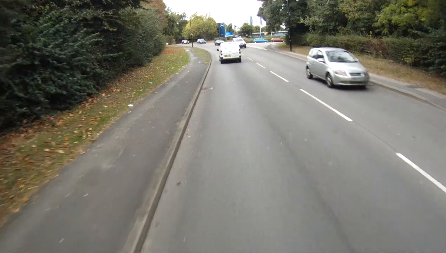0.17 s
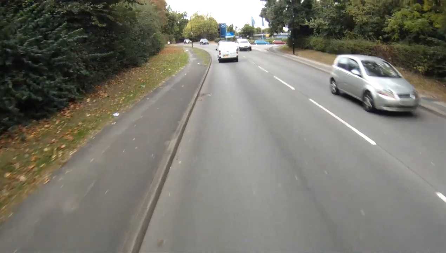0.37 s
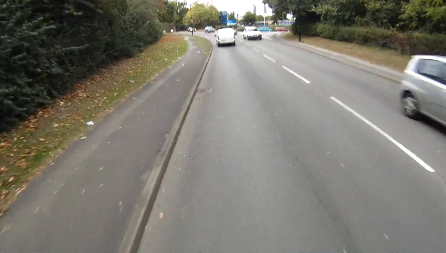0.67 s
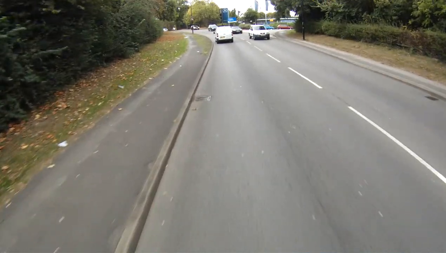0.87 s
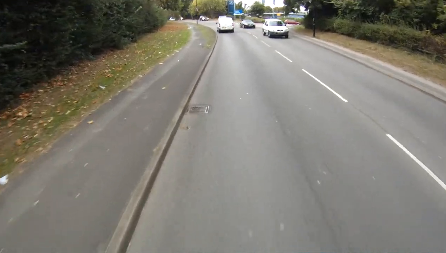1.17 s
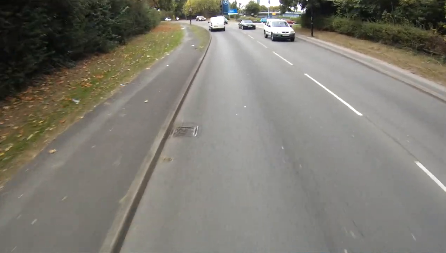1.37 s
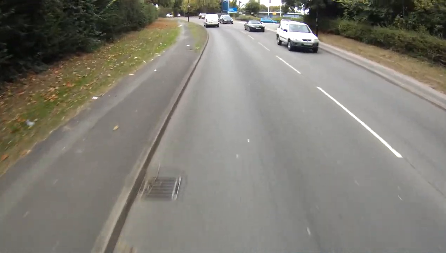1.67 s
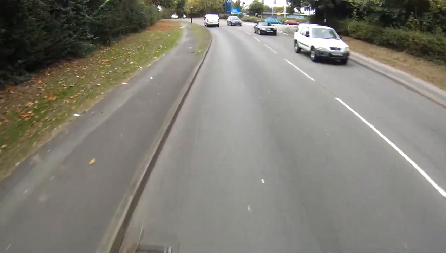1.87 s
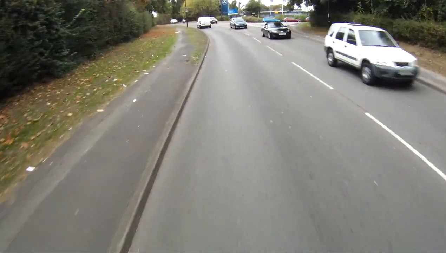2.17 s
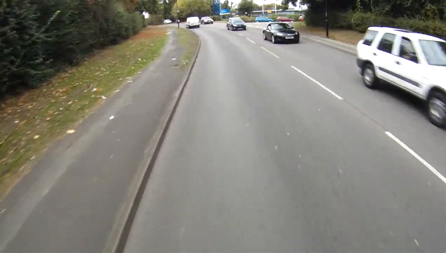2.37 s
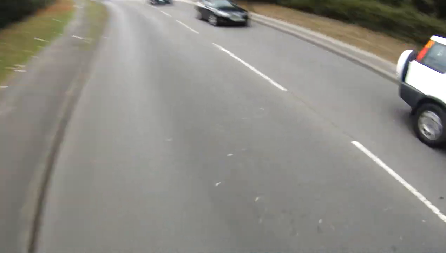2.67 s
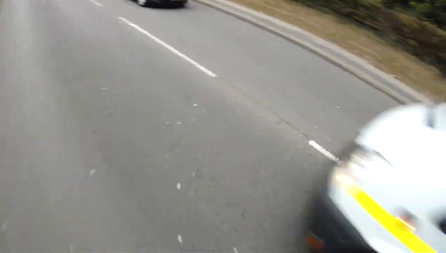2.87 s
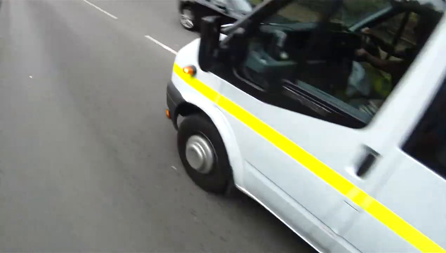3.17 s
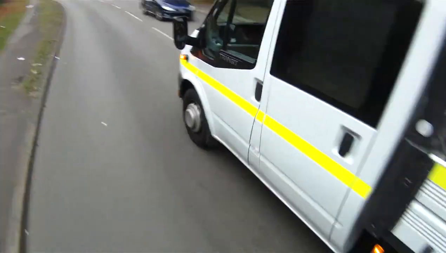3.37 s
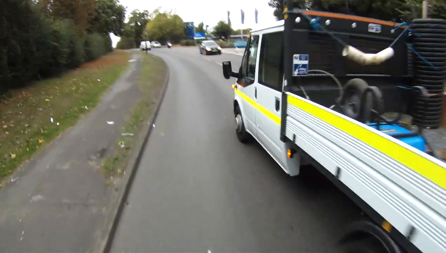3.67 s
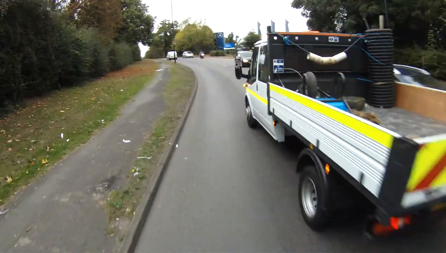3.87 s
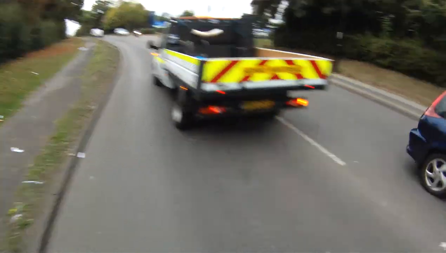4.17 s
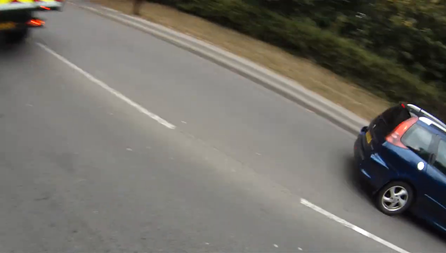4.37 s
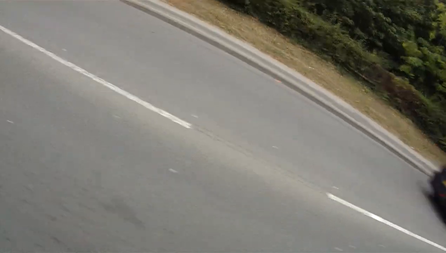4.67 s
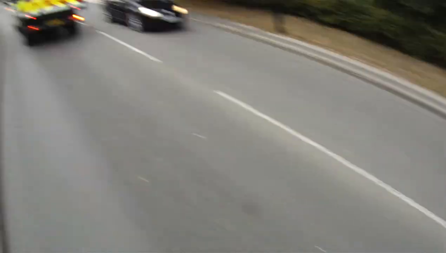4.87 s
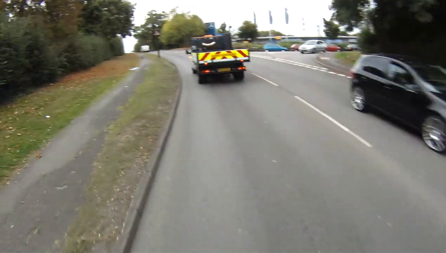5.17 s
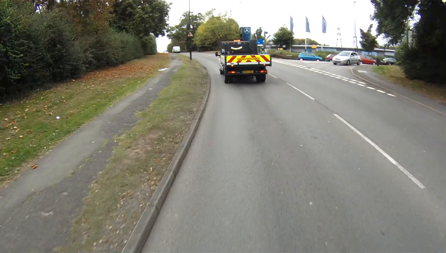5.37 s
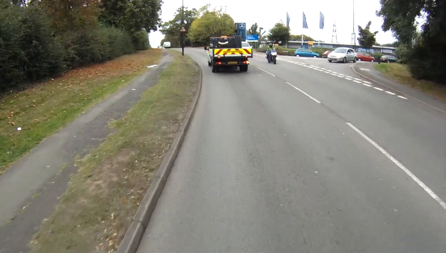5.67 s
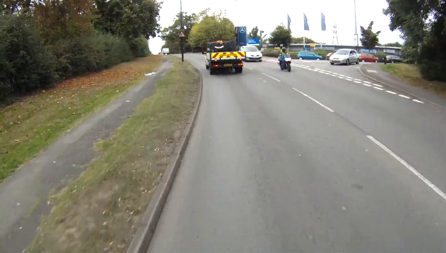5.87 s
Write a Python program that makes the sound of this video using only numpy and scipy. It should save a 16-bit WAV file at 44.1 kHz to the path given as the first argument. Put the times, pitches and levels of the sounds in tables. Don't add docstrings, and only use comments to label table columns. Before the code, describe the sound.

After a tiny silent start, wind buffets a cased microphone on a moving bicycle: low rumble, fluttering and irregular soft thumps, densest from 0.1 to 0.9 seconds, with a sharp case tick near 0.74. Cars pass closely in short tyre swells around 0.2, 0.65 and 1.1, then near 2. More wind puffs strike at 1.3 and around 2.17. From about 2.2 a low diesel drone fades in, and the truck's roar and body boom swell around 2.9. At 3.3 its horn sounds once, a loud buzzing toot of just under 0.6 seconds, wavering and sagging slightly, with a brief jolt at 3.68. The truck draws ahead, its engine rising briefly near 4.3 and gone by 4.7. A heavy thump and dull crack hit at 4.56, followed by rapid gust buffeting until 4.9. Then it is calmer, with light wind and vehicle roar growing from 5.6 towards 6 seconds.

```python
import sys
import numpy as np
from scipy import signal
from scipy.fft import rfft, irfft
from scipy.io import wavfile
from scipy.ndimage import uniform_filter1d

SR = 44100
rng = np.random.default_rng(int(sys.argv[2]) if len(sys.argv) > 2 else 0)


def transcribe(u):
    v = np.clip(np.atleast_2d(u).T, -1, 1)
    q = np.round(v * 32767).astype(np.int16)
    wavfile.write(sys.argv[1], SR, q)


def attenuation_scalar(level_db):
    decades = np.asarray(level_db, float) / 20
    return 10 ** decades


N = 264996


def level(x):
    return x / np.sqrt(np.mean(x ** 2))


def columns(table):
    s, *cols = np.transpose(table)
    return [np.interp(np.arange(N) / SR, s, c) for c in cols]


def band(x, lo_hz, hi_hz, order=2):
    edges_hz = [lo_hz, min(hi_hz, 0.45 * SR)]
    return signal.sosfilt(signal.butter(order, edges_hz, "band", fs=SR, output="sos"), x)


def walk(rate):
    k = int(SR / rate)
    steps = np.repeat(rng.standard_normal(N // k + 1), k)
    return 1.11 * uniform_filter1d(uniform_filter1d(steps, k), k)[:N]


def bell(s, spread):
    return np.exp(-0.5 * ((np.arange(N) / SR - s) / spread) ** 2)


def add(out, s, grain):
    i = int(s * SR) - len(grain) // 2
    out[i:i + len(grain)] += grain[:max(N - i, 0)]


def capsule_hiss():
    return attenuation_scalar(-88.5) * level(band(rng.standard_normal(N), 4500, 11000))


TURN_S = 2.36
# [t/s, deaf for/ms]
JOLT_S, JOLT_MS = (3.6805, 5.1)
# [t/s, level/dB]
GUSTS = [(.1, -43.5), (.36, -41.5), (.75, -29), (.95, -34.5), (1.3, -35), (1.62, -41.5), (2.1, -34.5),
         (2.52, -41), (2.86, -35), (3.22, -36), (3.36, -45), (3.8, -49), (4.1, -35.5), (4.5, -38.5),
         (4.6, -32), (4.87, -29.5), (4.96, -56), (5.95, -36.5)]


def gusts():
    gust_db, = columns(GUSTS)
    turned = np.clip((np.arange(N) / SR - TURN_S) / 0.12 + 0.5, 0, 1)
    rumble_db = -44 + 0.5 * (gust_db + 35) - 6 * turned + 11 * bell(JOLT_S, 0.066)
    flutter_db = gust_db - 6.6 * bell(3.03, 0.37) - 4.3 * bell(4.17, 0.12)
    return flutter_db, rumble_db


def eddy(db, hz, turns, side, lean):
    t = np.arange(-600, 601) / SR
    ms = min(1000 * turns / hz, 7)
    body = np.exp(-0.5 * (t * 2100 / ms) ** 2) * np.cos(2 * np.pi * hz * t + 0.65 * (lean - 0.5))
    edge = np.exp(-0.5 * (t * 2500 / ms) ** 2) * np.cos(2 * np.pi * 2.11 * hz * t + 3.4 * (lean - 0.5))
    return np.sign(side - 0.6) * attenuation_scalar(db) * (body + 0.25 * edge)


def eddy_grains():
    hits = rng.random(N) < 420 / SR
    return hits * rng.choice([-1, 1], N) * attenuation_scalar(2.0 * rng.exponential(size=N))


# [t/s, peak level/dB, f/Hz]
PUFFS = [(0.1479, -23.5, 302), (0.229, -15.5, 285), (0.2429, -14, 330), (0.3192, -22.5, 400),
         (0.3309, -18.5, 330), (0.3776, -18, 303), (0.4184, -13, 320), (0.4315, -17, 343),
         (0.522, -21, 334), (.528, -16, 330), (.5892, -20, 355), (0.6868, -22.5, 386), (0.7208, -18, 258),
         (0.7356, -16.5, 321), (0.7531, -12.5, 330), (0.761, -14, 238), (0.8278, -14, 470),
         (0.8409, -12.5, 312), (0.9183, -21, 220), (1.163, -30, 252), (1.3244, -15, 267),
         (1.3448, -13.5, 340), (1.4037, -21, 282), (1.5666, -22.5, 312), (1.8702, -18.5, 218),
         (1.894, -20.5, 274), (1.9952, -15.5, 290), (2.146, -20.5, 297), (2.1713, -10, 307),
         (2.209, -16, 234),
         (.7696, -14, 280), (.835, -18, 389), (1.579, -27, 150), (1.8769, -18.5, 394), (2.0392, -22, 214),
         (2.93, -25, 310), (3.676, -19.5, 170), (3.694, -27, 320), (4.215, -26, 241), (4.4, -48, 180),
         (4.5494, -21, 307), (4.5635, -6, 290), (4.5716, -19, 346), (4.586, -22, 249), (4.6264, -18, 488),
         (4.6419, -18, 540), (4.67, -22, 300), (4.6816, -17.5, 415), (4.718, -20, 484), (4.7376, -20, 348),
         (4.7772, -18, 516), (4.7871, -19, 413), (4.7931, -15, 457), (4.807, -23, 260), (4.8358, -20, 330),
         (4.8551, -16, 358), (4.8623, -20, 294), (4.87, -19.5, 440), (4.8869, -23, 466), (5.8, -24.5, 252)]


def wind(flutter_db, rumble_db):
    low_grains, high_grains = eddy_grains(), eddy_grains()
    patches = attenuation_scalar(2.7 * walk(18))
    high_share = attenuation_scalar(-10 + 5.5 * bell(4.78, 0.14))
    flutter = level(band(low_grains * patches, 140, 320))
    flutter = flutter + high_share * level(band(high_grains * patches, 380, 870))
    flutter = band(flutter, 82, 1080)
    rumble = level(band(rng.standard_normal(N), 38, 125)) * attenuation_scalar(1.4 * walk(9.5))
    out = flutter * attenuation_scalar(flutter_db - 2.5) + rumble * attenuation_scalar(rumble_db + 2.0)

    big_eddies = PUFFS
    chance = rng.random((len(big_eddies), 3, 5))
    for (s, db, hz), rows in zip(big_eddies, chance):
        for small, (side, lean, size, late, pitch) in zip((0, 1, 1), rows):
            turns = 0.8 * np.exp(0.14 * (2 * size - 1) + 0.27 * small)
            if small:
                eddy_s = s + 0.03 * (2 * late - 0.7)
                eddy_db = -14 + 0.51 * db - 6.3 * size
                eddy_hz = hz * (1 + 0.46 * (pitch - 0.6))
            else:
                eddy_s, eddy_db, eddy_hz, side = s, db, hz, s > TURN_S
            add(out, eddy_s, eddy(eddy_db, eddy_hz, turns, side, lean))
    return band(out, 55, 4400, order=1)


# [t/s, peak level/dB, centre f/Hz]
TICKS = [
    (.7262, -57, 11000),
    (.7362, -33, 9000),
    (.7364, -44, 5000),
    (.834, -57, 10000),
    (.84, -57, 9000),
    (4.571, -34, 2900),
    (4.5712, -34, 4900),
    (4.5714, -40, 7000),
]


def ticks():
    out = np.zeros(N)
    t = np.arange(-200, 200) / SR
    for s, db, hz in TICKS:
        crack = band(rng.standard_normal(len(t)), 0.68 * hz, 1.32 * hz, order=3)
        crack = crack * np.exp(-0.5 * (t / 0.0005) ** 2)
        add(out, s, attenuation_scalar(db) * crack / np.abs(crack).max())
    return out


# [closest t/s, tyre roar level/dB, spread/s, treble below roar/dB]
PASSES = [(0.211, -38.5, 0.096, 24.5), (0.419, -40, 0.042, 24.5), (0.651, -35.5, 0.09, 24.5),
          (1.1, -44.5, 0.17, 23), (1.56, -54, 0.056, 17.5), (1.951, -42.5, 0.2, 23),
          (2.15, -47, 0.053, 21.5), (2.72, -37, 0.18, 23.5), (2.93, -33.5, .11, 20.5), (3.21, -35, 0.1, 21),
          (3.59, -35, 0.094, 20.5), (3.9, -41, 0.11, 19.5), (4.06, -41.5, .05, 17.5),
          (4.18, -38, 0.098, 22), (4.488, -37.5, 0.088, 23.5), (4.778, -40.5, 0.047, 26.5),
          (5.05, -46.5, 0.082, 24.5), (5.26, -49, .1, 21.5), (5.62, -43, 0.09, 21.5), (5.92, -37, 0.12, 22)]


def passing():
    far_db, far_less_db = -54, 30.5
    roar = attenuation_scalar(2 * far_db)
    treble = attenuation_scalar(2 * (far_db - far_less_db))
    for s, db, spread, less_db in PASSES:
        near = bell(s, spread)
        roar = roar + attenuation_scalar(2 * db) * near
        treble = treble + attenuation_scalar(2 * (db - less_db)) * near
    return 10 * np.log10(roar), 10 * np.log10(treble)


# [f/Hz, level per Hz/dB]
TYRES = [(60, -23), (150, -16.5), (300, -6), (600, -4), (900, -2.5), (1600, -6), (2300, -13.5), (3400, -19),
         (4500, -31.5), (6300, -40.5), (9000, -50), (12000, -57.5), (15000, -63)]


def traffic(roar_db, treble_db):
    hz = np.maximum(np.fft.rfftfreq(N, 1 / SR), 1)
    tyre_hz, tyre_db = np.transpose(TYRES)
    colour = rfft(rng.standard_normal(N)) * attenuation_scalar(np.interp(np.log(hz), np.log(tyre_hz), tyre_db))
    middle = irfft(colour * (hz > 1150) * (hz < 2500), N)
    colour /= np.sqrt(np.mean(middle ** 2))
    tilt_db = treble_db - roar_db - np.mean(treble_db - roar_db)
    together_db = 0.14 * walk(7.6) + 0.43 * walk(30)
    out = 0
    for octave in np.arange(5.5, 14.5, 0.5):
        window = np.cos(np.pi * np.clip(np.log2(hz) - octave, -0.5, 0.5)) ** 2
        share = np.clip((octave - 10.8) / 0.89, -0.3, 1.2)
        slice_db = roar_db + share * tilt_db + together_db + 0.72 * walk(6.2)
        out = out + irfft(colour * window, N) * attenuation_scalar(slice_db)
    return out


# [t/s, level/dB, spread/s, low f/Hz, high f/Hz]
BOOMS = [
    (2.89, -34.5, 0.25, 243, 420),
    (3.64, -39.5, 0.14, 235, 450),
    (4.06, -41.5, 0.16, 235, 380),
    (5.6, -46, 0.25, 190, 420),
    (5.87, -39, 0.18, 666, 950),
    (4.79, -40.5, 0.06, 510, 1000),
    (4.76, -48, 0.023, 2400, 3100),
    (2.87, -65, 0.51, 4500, 9100),
]


def boom():
    out = 0
    for s, db, spread, lo_hz, hi_hz in BOOMS:
        noise = level(band(rng.standard_normal(N), lo_hz, hi_hz, order=3))
        out = out + attenuation_scalar(db) * bell(s, spread) * noise
    return out


# [t/s, firing f/Hz]
DIESEL = [
    (2.2, 57.44),
    (2.85, 64.65),
    (3.11, 65.76),
    (3.6, 69.75),
    (4.08, 71.83),
    (4.28, 78.3),
    (4.5, 73.1),
    (4.7, 74),
]
# [order, top level/dB, loudest t/s, period/s, depth/dB]
ORDERS = [
    (1, -46, 3.1, .98, 18),
    (2, -47.5, 2.77, .8, 7),
    (3, -52, 3.25, 1, 18),
]


def diesel():
    t = np.arange(N) / SR
    hz, = columns(DIESEL)
    phase = 2 * np.pi * np.cumsum(hz * (1 + 0.0027 * walk(16))) / SR
    near = np.clip(np.minimum(t - DIESEL[0][0], DIESEL[-1][0] - t) / 0.083, 0, 1)
    drone = 0
    for k, db, s, period, depth_db in ORDERS:
        away_db = 6 * (k - 1) * np.maximum(t - 3.7, 0)
        sunk_db = depth_db * np.sin(np.pi * (t - s) / period) ** 4
        drone = drone + attenuation_scalar(db - away_db - sunk_db + 0.82 * walk(8)) * np.sin(round(k) * phase)
    return np.sqrt(2) * near * drone


# [t/s, f/Hz]
HORN = [
    (3.284, 517.5),
    (3.296, 527),
    (3.376, 535.3),
    (3.44, 532.5),
    (3.5, 529.5),
    (3.67, 527),
    (3.72, 525.6),
    (3.82, 518.6),
    (3.86, 529),
]
# [multiple, top level/dB, loudest t/s, spread/s]
BEAM = [(1, -29.5, 3.35, 0.41), (1, -40, 3.7, 0.013), (2, -31.5, 3.5, 0.86), (2, -35, 3.47, 0.027),
        (2, -34, 3.69, 0.036), (2, -41, 3.84, 0.014), (3, -23.5, 3.288, .006), (3, -28.5, 3.315, 0.023),
        (3, -36, 3.45, 0.44), (3, -38, 3.5, 0.013), (4, -41, 3.33, 0.041), (4, -44, 3.6, 0.18),
        (5, -46.5, 3.48, .22), (6, -50, 3.45, .04), (6, -53, 3.57, 0.28), (7, -55, 3.38, 0.036),
        (7, -52, 3.49, .06), (8, -62, 3.45, 0.14), (9, -64, 3.5, .15), (10, -73, 3.44, .15),
        (13, -71.5, 3.4, .1), (14, -76, 3.4, .1), (17, -75, 3.42, .1)]
# [t/s, partial, depth/dB, width/ms]
NULLS = [(3.41, 1, 3.5, 7.2), (3.5, 1, 2, 18.2), (3.645, 1, 12, 8), (3.729, 1, 19, 5), (3.81, 1, 9, 10),
         (3.345, 2, 6, 17), (3.41, 2, 7, 7.4), (3.59, 2, 10, 12), (3.632, 2, 10, 5), (3.765, 2, 4, 5),
         (3.74, 2, 8, 12), (3.8, 2, 10, 4.6), (3.43, 3, 4, 13), (3.57, 3, 22, 12), (3.675, 3, 12, 15),
         (3.78, 3, 26, 3.1), (3.7, 3, 22, 2.9), (3.395, 4, 10, 5.1), (3.4, 5, 12, 13), (3.5, 5, 12, 8)]


def horn():
    on_s, off_s = 3.284, 3.862
    t = np.arange(N) / SR
    hz, = columns(HORN)
    phase = 2 * np.pi * np.cumsum(hz * (1 + 0.0015 * walk(40))) / SR
    tone = 0
    for k in sorted({round(row[0]) for row in BEAM}):
        beam = sum(attenuation_scalar(db) * bell(s, spread) for m, db, s, spread in BEAM if round(m) == k)
        lost_db = sum(db * bell(s, ms / 1000) for s, m, db, ms in NULLS if round(m) == k)
        waver = min(k / 4, 1.6)
        strength = beam * attenuation_scalar(1.4 * waver * walk(65) - lost_db)
        tone = tone + strength * np.sin(k * phase + 0.6 * waver * walk(30))
    rise = np.clip(np.maximum(t - on_s, 0) / 0.0037, 0, 1)
    fall = np.exp(-np.maximum(t - off_s, 0) / 0.017)
    return np.sqrt(2) * tone * rise * fall


def scene():
    jolt = bell(JOLT_S, JOLT_MS / 2000)
    mono = capsule_hiss() + wind(*gusts()) + ticks()
    mono += traffic(*passing()) * (1 - 0.28 * jolt) + boom() + diesel()
    mono += horn() * np.clip(1 - 2.0 * jolt, 0, 1)
    return np.array([mono, mono])


def low_pass(x):
    return signal.sosfilt(signal.butter(12, 15000, fs=SR, output="sos"), x)


def record(dry):
    start_s = 0.077
    t = np.arange(N) / SR
    hiss = attenuation_scalar(-87.5) * level(band(rng.standard_normal(N), 3500, 13000))
    stray = attenuation_scalar(-44 + 10.3 * walk(24.95)) * band(np.roll(dry[0], 40), 70, 7000, order=1)
    fade = np.clip((t - start_s) / 0.013, 0.1, 1) * (np.arange(N) > start_s * SR)
    mix = (dry + (hiss + stray) * np.array([[1], [-1]])) * fade
    return low_pass(mix)


dry = scene()
out = record(dry)
transcribe(out)
```